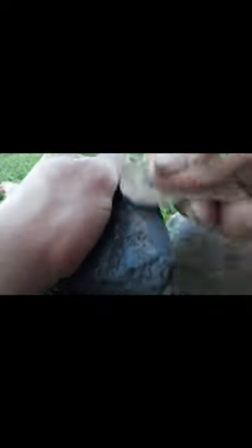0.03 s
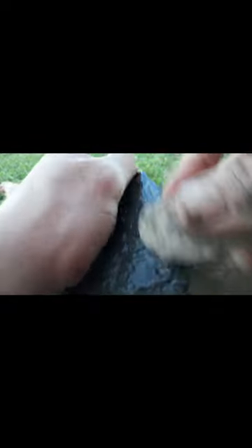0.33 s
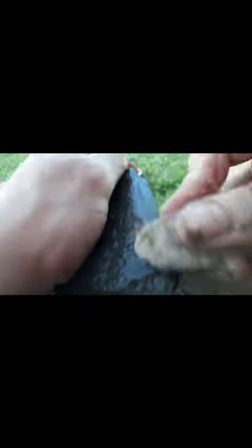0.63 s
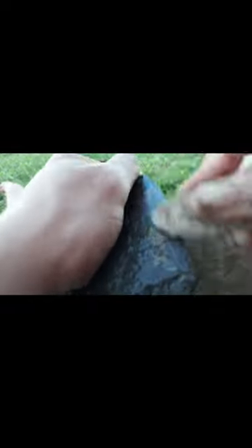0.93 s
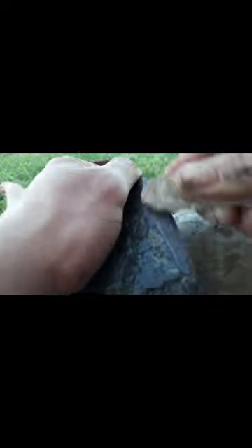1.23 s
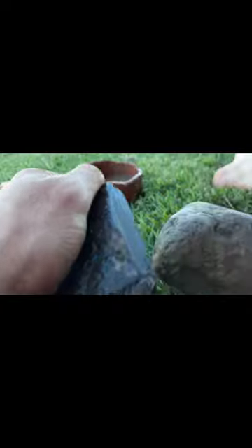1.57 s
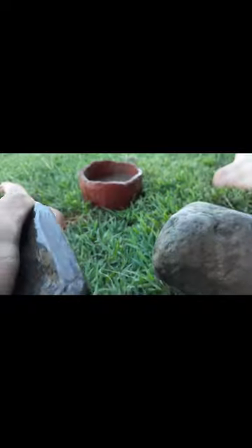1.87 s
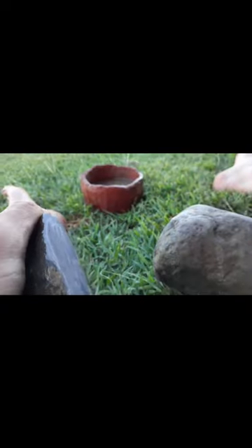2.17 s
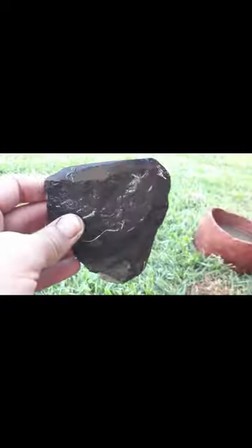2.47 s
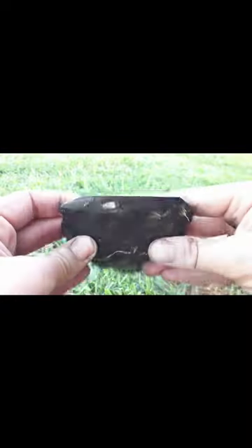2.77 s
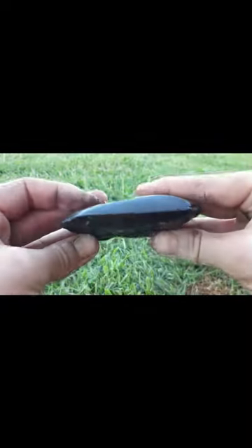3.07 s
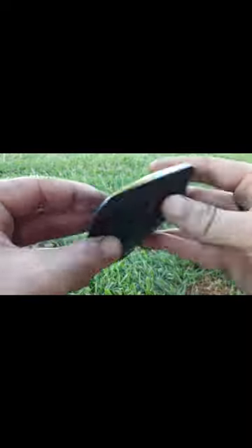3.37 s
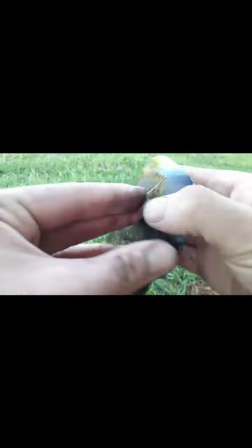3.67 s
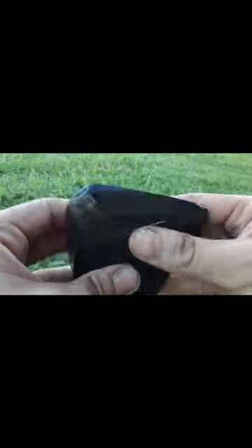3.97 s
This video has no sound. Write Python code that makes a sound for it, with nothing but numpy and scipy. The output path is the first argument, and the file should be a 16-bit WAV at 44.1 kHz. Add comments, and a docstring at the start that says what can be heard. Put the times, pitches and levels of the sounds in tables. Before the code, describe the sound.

A stone scrapes rapidly back and forth along a stone slab, close and gritty, ending with a sharper rasp at 1.5 seconds. Low wind pops hit the microphone around 0.6 seconds. Fingers faintly brush the slab near 1.8 and 3.5 seconds. From about 2.3 seconds the quiet outdoor background turns hissier, with a barely audible distant cricket, and light wind puffs return, mostly from 3.4 to 4 seconds.

```python
"""Stone rubbed along a slab

Outdoors and close up, a hand-held stone scrubs quickly back and forth along a slab's edge. Grit hisses
and grinds with each stroke's speed; the edge catches now and then, hardest as the stone slides off.
Fingers then brush the slab as it is turned. Light wind puffs and pops on both microphone ports.
After a short break the background is hissier and a far-off cricket chirps."""
import sys
import numpy as np
from scipy import signal
from scipy.fft import rfft, irfft, next_fast_len
from scipy.io import wavfile
from scipy.ndimage import uniform_filter1d, map_coordinates

SR = 44100
rng = np.random.default_rng(int(sys.argv[2]) if len(sys.argv) > 2 else 0)


def log_audio(samples):
    """Write samples as a 16-bit WAV file to the path given in sys.argv[1]."""
    # one column per channel
    frames = np.atleast_2d(samples).T
    # limit to full scale, then quantise
    limited = np.clip(frames, -1, 1)
    pcm = np.round(limited * 32767).astype(np.int16)
    wavfile.write(sys.argv[1], SR, pcm)


N = 176400

# strokes, each lasting until the next: t/s, hiss/dB, grind/dB, pressure gained over the stroke/dB
STROKES = [(-.04, -35, -42, -3), (0.015, -39.5, -46.5, 17), (0.091, -40.5, -48, -16.5),
           (0.173, -39, -48.5, -12.5), (0.237, -41.5, -48, 11), (0.312, -41.5, -48.5, -15),
           (0.375, -41, -48, 16), (0.44, -40.5, -48, -1.5), (0.504, -41, -49.5, 9.5),
           (0.577, -40, -46.5, -11), (0.659, -39, -48.5, -1), (0.72, -40, -51, 10), (.795, -45.5, -49, -11),
           (0.876, -46, -53.5, -10), (0.943, -44, -49, -3), (1.011, -44, -53, 6), (1.062, -43, -45, -0.5),
           (1.135, -41.5, -49.5, 10), (1.205, -45, -50.5, 7.5), (1.285, -42, -51.5, 8),
           (1.338, -45, -56, 12), (1.412, -45.5, -49.5, -7)]
# colour of coarse grinding: f/Hz, level/dB
GRIND = [(150, -8), (550, -20.5), (900, -12.5), (1450, -12.5), (1950, -3.5), (4300, -4), (6000, -11),
         (8400, -6), (9800, -17.5), (15700, -4)]
# balance of the hissy air and the cricket: f/Hz, left minus right/dB
AIR_PAN = [(1200, 0), (12000, 4)]
LIFT_S, BREAK_S, RESUME_S = 1.503, 2.322, 2.35  # the stone lifts off; the break starts and ends
CONTACT_OCTAVES = 0.31  # width of the contact resonance


def scraping():
    """Stone drags over grit: the hiss follows each stroke's speed more steeply than the grind does."""
    skew, flatten, creep = 0.87, 1.36, 0.037  # speed peaks early, levels off, never quite stops at a turn
    stroke, progress = stroke_motion()
    _, hiss_db, grind_db, lean_db = np.array(STROKES)[stroke].T
    swing = np.abs(np.sin(np.pi * progress ** skew))
    speed = (np.tanh(flatten * swing) / np.tanh(flatten) + creep) * (clock() < LIFT_S)
    pressure = amp(lean_db * (progress - .5) + 1.67 * wobble(90.08))
    hiss_colour = [(1400, -20), (2000, -14), (3000, -42), (4300, -7.5), (5200, -2.5), (6600, 1.5),
                   (7350, -7), (8450, -1), (9900, -7), (12400, -9), (13500, -4), (14400, -12),
                   (15700, -0.5)]  # fine grit: f/Hz, level/dB
    hiss = grit(hiss_colour, contact_hz(), boost_db=2.0, ring=0.43, judder_db=1.0)
    grind = grit(GRIND, contact_hz(), boost_db=3.5, ring=amp(-6.5), judder_db=0.9)
    hiss_gain = amp(hiss_db) * speed ** 3.3
    grind_gain = amp(grind_db + 1.5 * progress) * speed ** 0.71  # digs in late in the stroke
    return pressure * (hiss_gain * hiss + grind_gain * grind)


def stroke_motion():
    """The hand's travel, per sample: which stroke it is on and the share of it that is done."""
    starts = [row[0] for row in STROKES]
    travel = np.interp(clock(), np.append(starts, LIFT_S), np.arange(len(starts) + 1))
    stroke = np.minimum(travel.astype(int), len(starts) - 1)
    return stroke, travel - stroke


def contact_hz():
    """The contact resonance glides down on one stroke and up on the next, and slowly climbs."""
    start_hz, end_hz, glide_octaves = 3840, 6740, 0.44
    stroke, progress = stroke_motion()
    centre = np.interp(clock(), [0, LIFT_S], [start_hz, end_hz])
    return centre * 2 ** (glide_octaves * (-1) ** (stroke + 1) * (progress - .5))


def grit(colour, centre_hz, boost_db, ring, judder_db, octaves=CONTACT_OCTAVES):
    """Dense tiny collisions of grains ring the stones, which the hands damp."""
    stone_modes = [(2370, -7), (3100, 0.5), (3520, -4.5), (3865, -3), (4200, 0), (4635, 0.5), (5400, 0),
                   (6600, 1), (8420, 2)]  # the stone's ring: f/Hz, level/dB
    likeness = [(1200, 0.36), (2500, 0.057), (4400, 0.22), (5200, 0.74), (7000, 0.078)]  # stereo focus of the rub: f/Hz, left-right likeness
    pan = [(1100, -1.5), (2000, -5.5), (2600, 4), (4500, 9), (5300, 2), (6100, 3.5), (6700, 1.5),
           (8500, 7.5), (15000, 6.5)]  # balance of the rub: f/Hz, left minus right/dB
    grains_per_s, q = 16000, 88

    def body(hz):
        return sum(amp(db) * 1j * hz * f / (q * (f * f - hz * hz) + 1j * hz * f) for f, db in stone_modes)

    hits = (rng.random((2, N)) < grains_per_s / SR) * rng.standard_normal((2, N))
    hits = hits * amp(judder_db * wobble(420))
    grains = contact_colour(hits, centre_hz, boost_db, octaves)
    rubbed = filtered(grains, lambda hz: amp(along(colour, hz)) * (1 + ring * body(hz)))
    return placed(rubbed, likeness, pan, left_lag_s=.00005)


def contact_colour(pair, centre_hz, boost_db, octaves):
    """The colour shifts with the contact point: one broad resonance and small random patches."""
    patch_db = 3.5
    hz, t, spectra = signal.stft(pair, SR, nperseg=256)
    patches = uniform_filter1d(rng.standard_normal(spectra.shape[1:]), size=3, axis=0)
    patches = unit(uniform_filter1d(patches, size=7, axis=1))
    detune = np.log2((hz[:, None] + 1) / np.interp(t, clock(), centre_hz))
    peak = np.exp(-.5 * (detune / octaves) ** 2)
    return signal.istft(spectra * amp(boost_db * peak + patch_db * patches), nperseg=256)[1][:, :N]


def catches():
    """The edge snags on bumps in short, ringing rasps, then slips off the end of the slab."""
    bumps = [(.005, 0.014, -40), (0.148, 0.0062, -40), (0.201, 0.013, -43.5), (0.284, 0.012, -36),
             (0.339, 0.0074, -37.5), (0.685, 0.0039, -42), (0.826, 0.0046, -39), (0.984, 0.0085, -41.5),
             (1.18, 0.0046, -50), (1.315, 0.0067, -45), (1.395, 0.0058, -38)]  # snags along the edge: t/s, half length/s, level/dB
    slip_s, slip_hz, slip_db = 1.481, 2630, -28
    snags = sum(amp(db) * swell(s, width) for s, width, db in bumps)
    rasp = grit(GRIND, contact_hz(), boost_db=3.5, ring=2.1, judder_db=2.2)
    slip = grit(GRIND, np.full(N, slip_hz), boost_db=3, ring=1.24, judder_db=0.7, octaves=0.34)
    return snags * rasp + amp(slip_db) * swell(slip_s, 0.0065) * slip


def handling():
    """Fingers slide over the slab, sticking and slipping slightly."""
    brushes = [(1.785, 0.049, -60.5, -59), (3.46, 0.038, -58.5, -61), (3.73, 0.054, -59.5, -62.5)]  # finger strokes: t/s, half length/s, left/dB, right/dB
    skin = [(500, -21), (4500, -3.5), (8500, -1.5), (15700, -3)]  # colour of skin on stone: f/Hz, level/dB
    return swells(brushes) * unit(noise(skin) * amp(2.2 * wobble(220)))


def wind_puffs():
    """Each puff buffets the two ports separately, over a breeze of small eddies; rough puffs reach higher."""
    # puffs of air: t/s, half length/s, left/dB, right/dB, offset of the rough top/dB
    puffs = [(0.147, 0.044, -46.5, -65, -21), (0.469, 0.019, -32.5, -49, -17),
             (0.543, 0.028, -34, -48.5, -16), (0.673, 0.017, -31.5, -51, 2.5), (1.09, 0.014, -43, -57, -7),
             (2.651, 0.014, -42.5, -40.5, -7.5), (2.757, 0.027, -50, -48.5, -17),
             (2.99, 0.02, -56, -55, -6), (3.415, 0.0072, -40, -35, -3.5), (3.464, 0.026, -41, -38.5, -9),
             (3.639, 0.011, -52, -38, -0.5), (3.7, 0.023, -41.5, -43, 2), (3.795, 0.03, -37, -35.5, -1.5),
             (3.862, 0.013, -41, -40, 3.5), (3.956, 0.037, -36.5, -39, -4)]
    buffet = [(20, -25), (70, 0), (120, -2.5), (250, -12), (400, -22.5), (600, -39), (4000, -100)]  # colour of the turbulence: f/Hz, level/dB
    rough_from_hz, puff_edge, breeze_db, eddies_per_s = 191, 2.45, -68.5, 31
    eddies = noise(buffet)
    strength = np.sqrt(np.abs(uniform_filter1d(eddies ** 2, size=900, axis=1)) + 0.015)
    eddies = eddies / uniform_filter1d(strength, size=300, axis=1)  # evened out: the puffs set the shape
    rumble = filtered(eddies, lambda hz: 1 / (1 + (hz / rough_from_hz) ** 6))
    breeze = amp(breeze_db + 4.5 * np.array([wobble(eddies_per_s), wobble(eddies_per_s)]))
    push = swells([row[:-1] for row in puffs], puff_edge)
    rough = swells([(s, width, left + db, right + db) for s, width, left, right, db in puffs], puff_edge)
    return (push + breeze) * rumble + rough * (eddies - rumble)


def wind_pops():
    """Each pop is one low push of air on the ports, with a rebound on either side."""
    pops = [(0.573, 0.0017, -17.5, -49), (0.658, 0.001284, -19, -45), (0.673, 0.0023, -21.5, -42),
            (3.487, 0.0031, -29, -28.5)]  # jolts of air: t/s, half length/s, left peak/dB, right peak/dB
    pulse = lambda u: (1 - u * u) * np.exp(-.5 * u * u)
    return sum(amp([[left], [right]]) * pulse((clock() - s) / width) for s, width, left, right in pops)


def cricket():
    """A far-off cricket's wings rasp out narrow chirps at a loose beat, after the break."""
    pitch_hz, level_db, chirps_per_s, on_beat_s = 7760, -73.5, 7.75, 2.5
    t = clock()
    beat = np.pi * chirps_per_s * (t - on_beat_s + .01 * wobble(10))
    chirps = np.abs(np.cos(beat)) ** 2.4 * (t > RESUME_S)
    wings = placed(band(pitch_hz, width_hz=80), [(pitch_hz, .85)], AIR_PAN)
    return amp(level_db + 2 * wobble(18)) * chirps * wings


def garden():
    """Distant rumble and a faint rustle before the break; a hissier bed of air after it."""
    quiet_air = [(25, -17), (70, -6.5), (230, -1.5), (480, -25.5), (800, -21), (1200, -32), (3900, -29.5),
                 (6900, -33), (8300, -29.5), (10500, -36.5), (15700, -39.5)]  # colour of the first bed: f/Hz, level/dB
    hissy_air = [(20, -14), (64, 7), (283, 3), (361, -5.5), (1200, -4.5), (2100, -6.5), (4300, -6),
                 (6900, -10), (8400, -8.5), (15700, -17)]  # colour of the second bed: f/Hz, level/dB
    quiet_pan = [(800, 1.5), (2000, -3), (4300, 3.5), (6500, 6.5), (9000, 4.5)]  # balance of the first bed: f/Hz, left minus right/dB
    likeness = [(300, 0.9), (1800, 0.23)]  # stereo focus of both beds: f/Hz, left-right likeness
    rustles = [(2.15, 0.2, -81, -74)]  # distant rustle: t/s, half length/s, left/dB, right/dB
    t = clock()
    quiet = amp(-62 + 2.3 * wobble(8.1)) * placed(noise(quiet_air), likeness, quiet_pan)
    hissy_gain = amp(-61 + 0.55 * wobble(4.98))
    hissy = hissy_gain * placed(noise(hissy_air), likeness, AIR_PAN, left_lag_s=-0.000435)
    rustle = swells(rustles) * band(centre_hz=2140, width_hz=360)
    return (quiet + rustle) * (t < BREAK_S) + hissy * (t > RESUME_S)


def amp(db):
    """Gain of a level in dB."""
    return 10 ** (np.asarray(db) / 20)


def unit(x):
    """Scaled to rms 1."""
    return x / np.sqrt(np.mean(x ** 2) + 1e-20)


def along(points, hz):
    """A curve through (f/Hz, value) points on a log frequency axis."""
    f, values = np.transpose(points)
    return np.interp(np.log(hz + 1), np.log(f + 1), values)


def clock():
    """Time of each sample in seconds."""
    return np.arange(N) / SR


def wobble(rate):
    """A smooth random curve, rate knots a second."""
    return map_coordinates(rng.standard_normal(int(N * rate / SR) + 4), [clock() * rate])


def swell(s, width, edge=2):
    """A rise and fall around a moment: a bell, or flatter on top for a steeper edge."""
    return np.exp(-.5 * np.abs((clock() - s) / width) ** edge)


def swells(rows, edge=2):
    """Left and right envelopes of a table of swells, summed in power."""
    gains = (amp([[left], [right]]) * swell(s, width, edge) for s, width, left, right in rows)
    return np.sqrt(sum(gain ** 2 for gain in gains))


def filtered(x, response):
    """x through a filter, given as a complex response of frequency."""
    size = next_fast_len(N + SR // 4)
    return irfft(rfft(x, size) * response(np.fft.rfftfreq(size, 1 / SR)), size)[..., :N]


def noise(colour):
    """Two unrelated coloured noises of rms 1."""
    return unit(filtered(rng.standard_normal((2, N)), lambda hz: amp(along(colour, hz))))


def band(centre_hz, width_hz):
    """Two unrelated narrow noises of rms 1."""
    bell = lambda hz: np.exp(-.5 * ((hz - centre_hz) / width_hz) ** 2)
    return unit(filtered(rng.standard_normal((2, N)), bell))


def placed(pair, likeness, pan, left_lag_s=0):
    """Two unrelated signals blended into left and right, with likeness, balance and delay; rms 1."""
    angle = lambda hz: np.arccos(np.clip(along(likeness, hz), -1, 1)) / 2
    mid, side = filtered(pair, lambda hz: np.array([np.cos(angle(hz)), np.sin(angle(hz))]))
    half = np.array([[.5], [-.5]])
    steer = lambda hz: amp(half * along(pan, hz)) * np.exp(-2j * np.pi * hz * left_lag_s * half)
    return unit(filtered(np.array([mid + side, mid - side]), steer))


def scene():
    """Stones and hands up front, wind on the ports, garden and cricket behind."""
    return scraping() + catches() + handling() + wind_puffs() + wind_pops() + garden() + cricket()


def record(dry):
    """The sound drops out during the break, and a steep high cut takes off the very top."""
    top_hz = 15900
    t = clock()
    gate = np.where((t > BREAK_S) & (t < RESUME_S), amp(-24), 1)
    return filtered(dry * gate, lambda hz: np.clip((top_hz - hz) / 200, 0, 1) ** 2)


dry = scene()
out = record(dry)
log_audio(out)
```